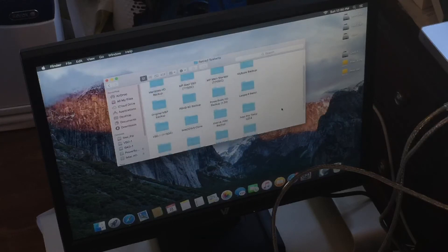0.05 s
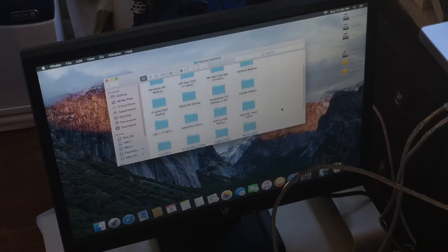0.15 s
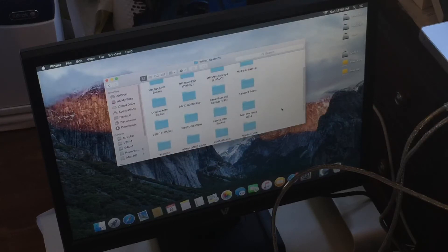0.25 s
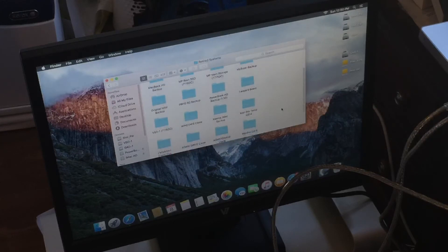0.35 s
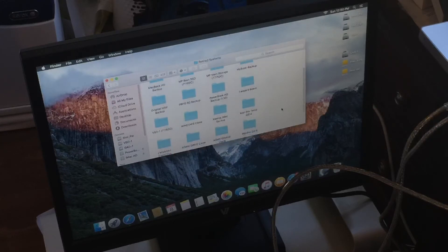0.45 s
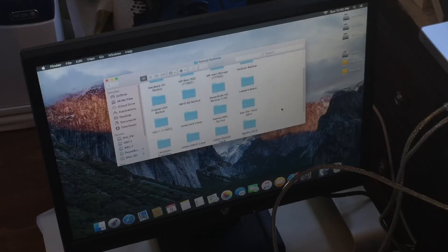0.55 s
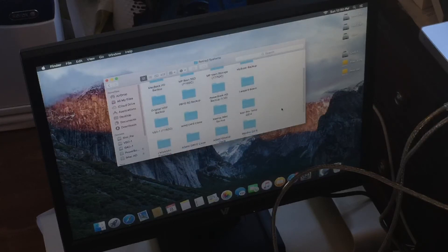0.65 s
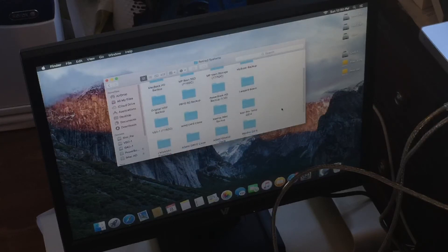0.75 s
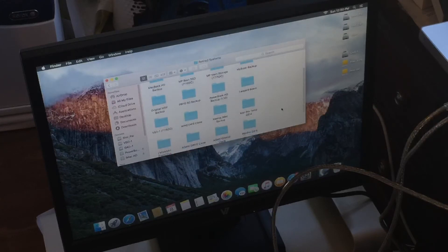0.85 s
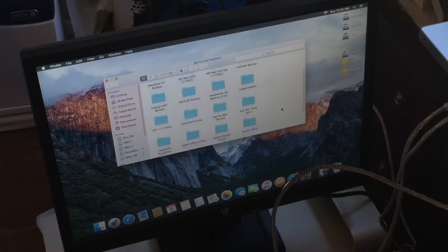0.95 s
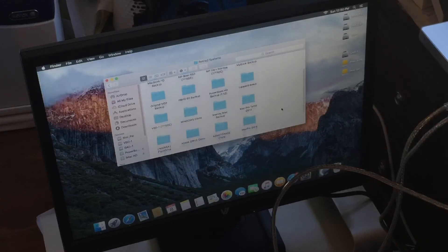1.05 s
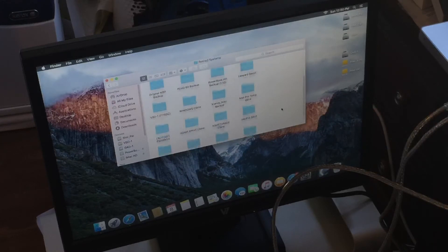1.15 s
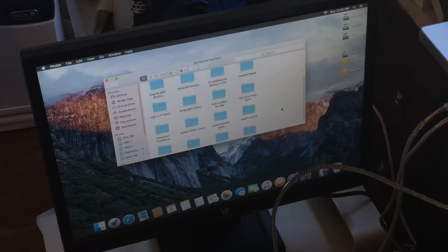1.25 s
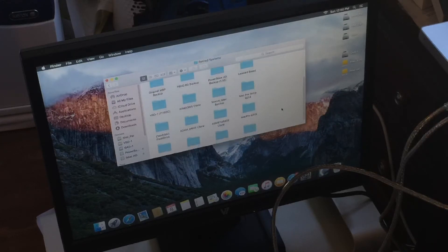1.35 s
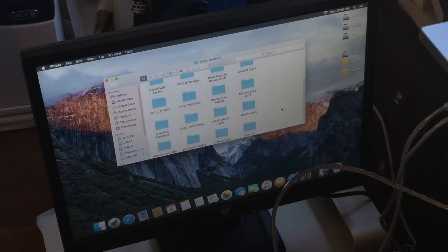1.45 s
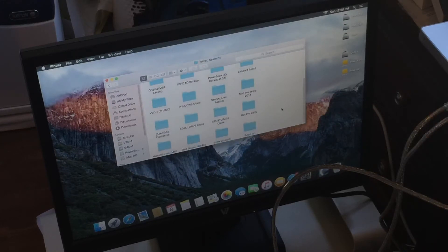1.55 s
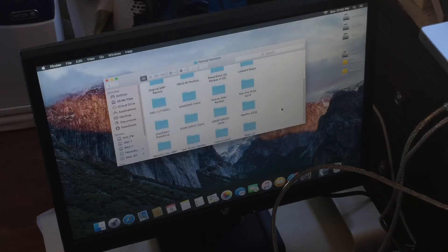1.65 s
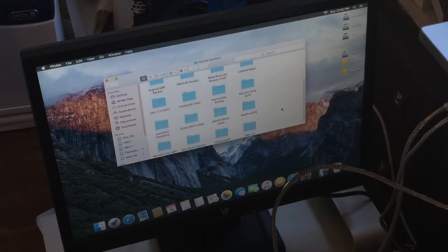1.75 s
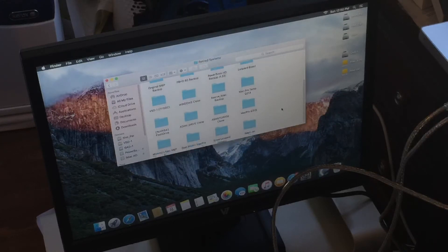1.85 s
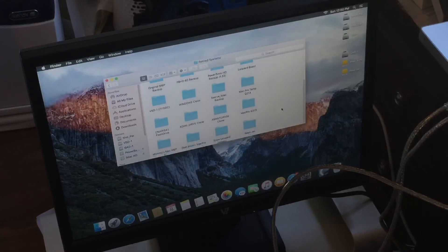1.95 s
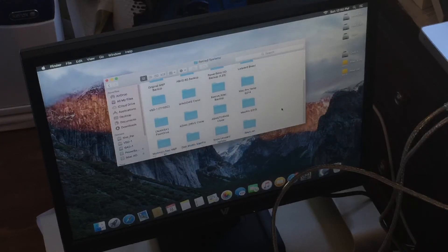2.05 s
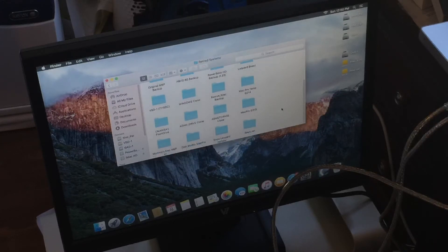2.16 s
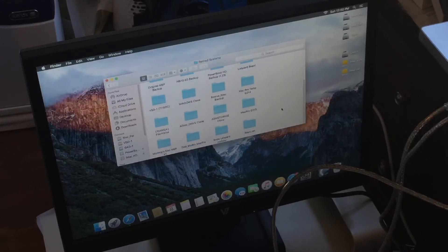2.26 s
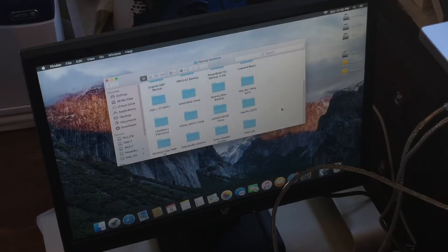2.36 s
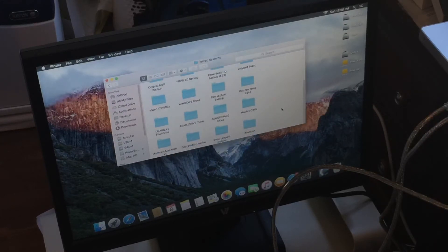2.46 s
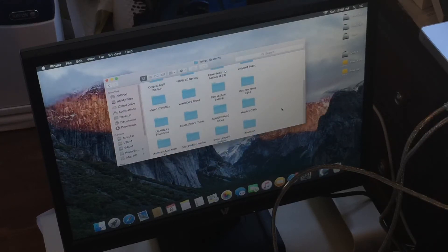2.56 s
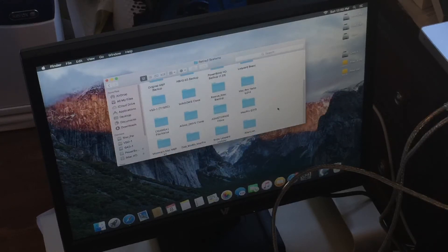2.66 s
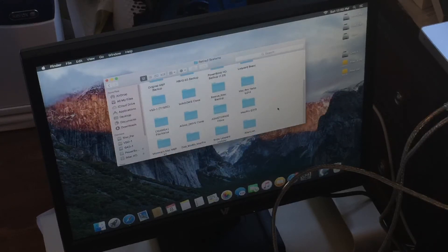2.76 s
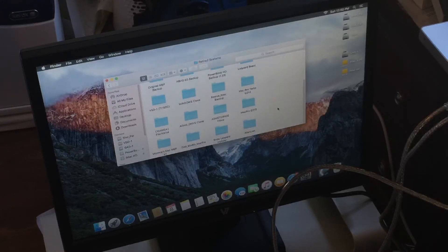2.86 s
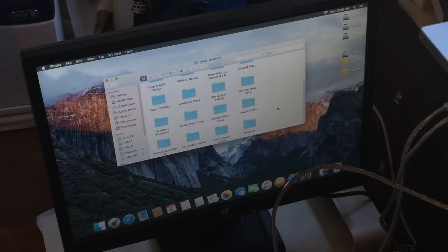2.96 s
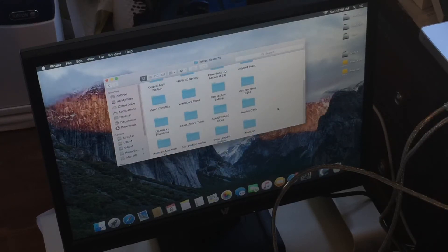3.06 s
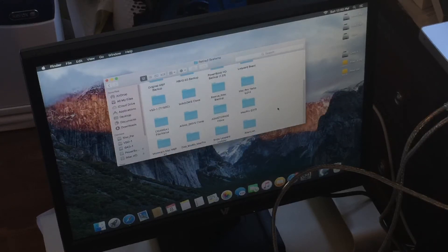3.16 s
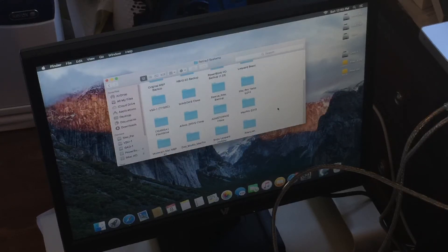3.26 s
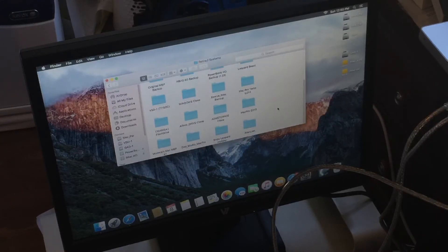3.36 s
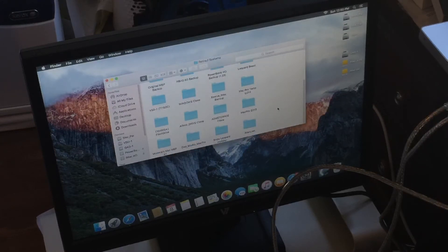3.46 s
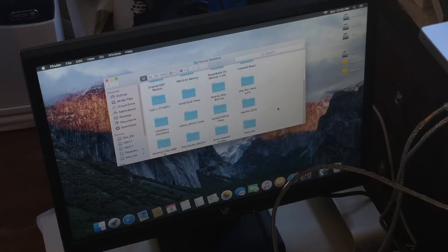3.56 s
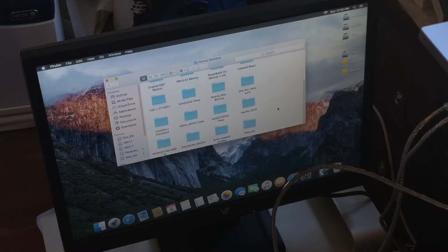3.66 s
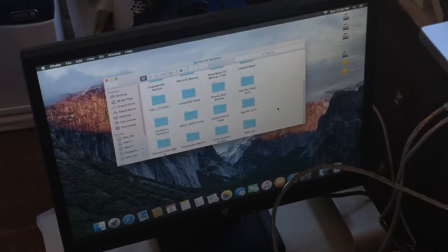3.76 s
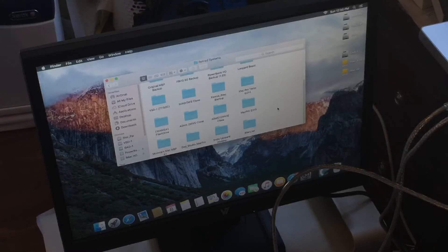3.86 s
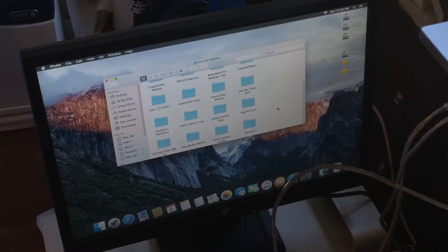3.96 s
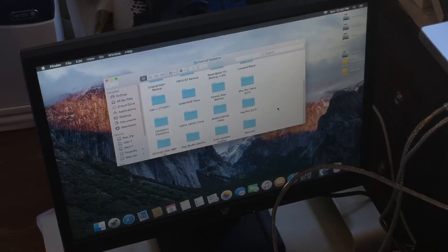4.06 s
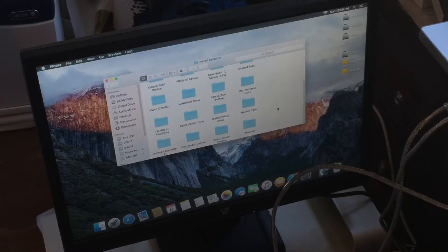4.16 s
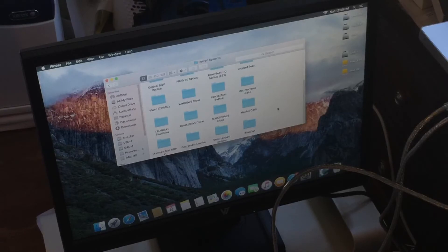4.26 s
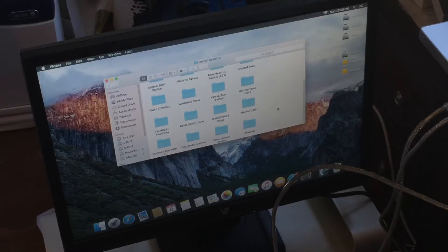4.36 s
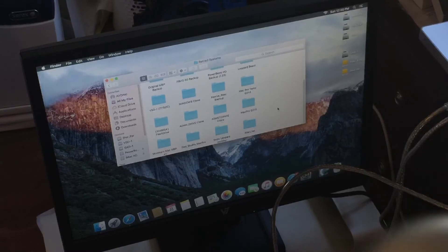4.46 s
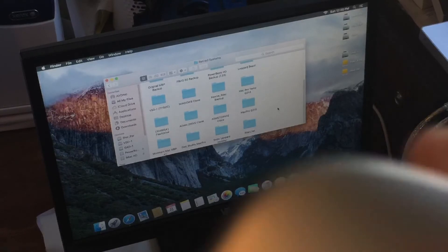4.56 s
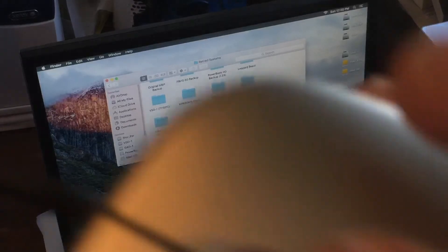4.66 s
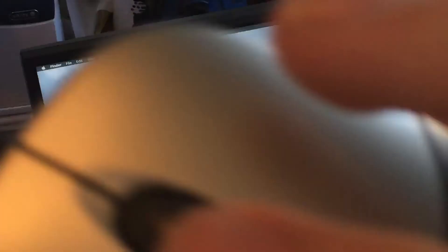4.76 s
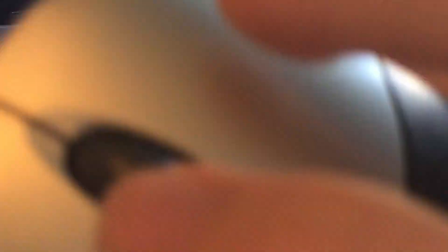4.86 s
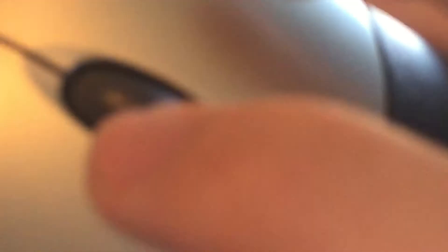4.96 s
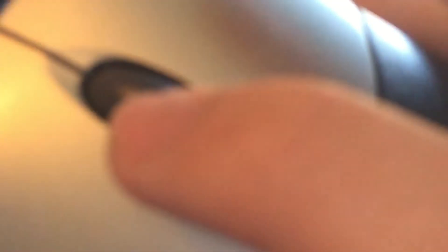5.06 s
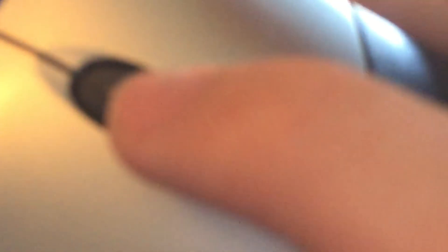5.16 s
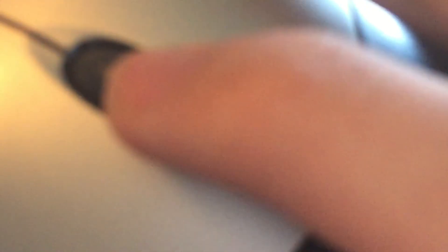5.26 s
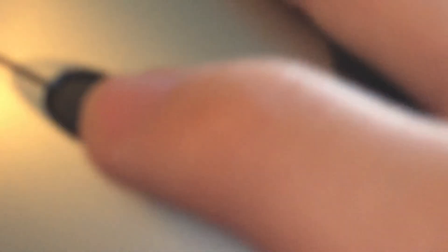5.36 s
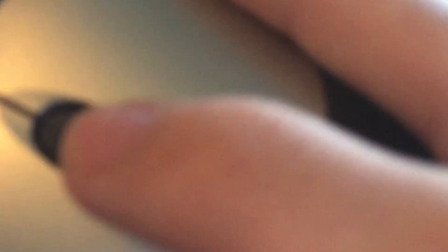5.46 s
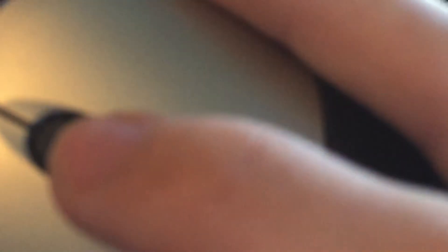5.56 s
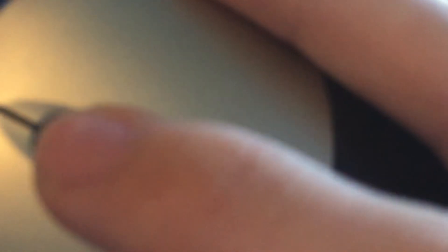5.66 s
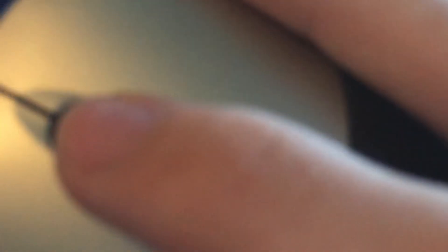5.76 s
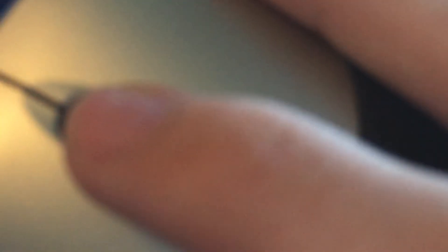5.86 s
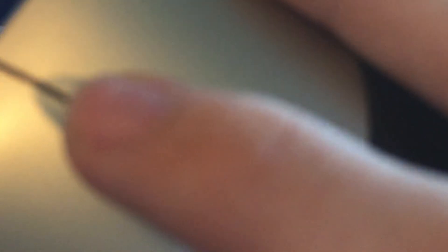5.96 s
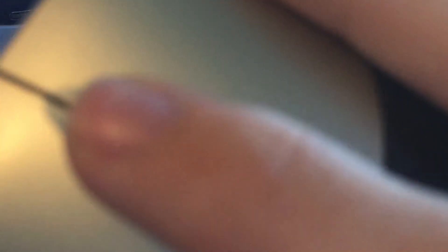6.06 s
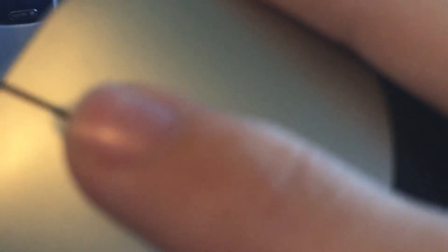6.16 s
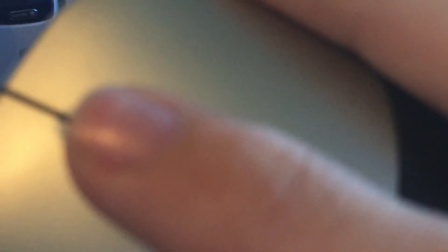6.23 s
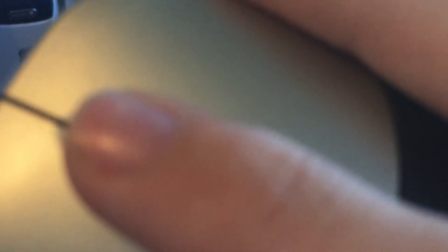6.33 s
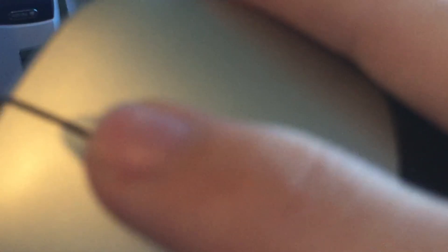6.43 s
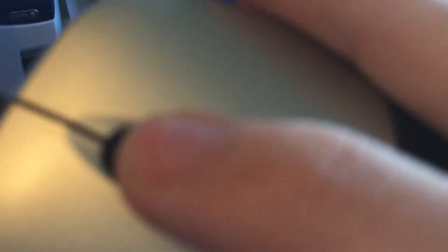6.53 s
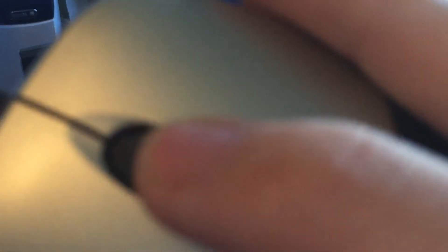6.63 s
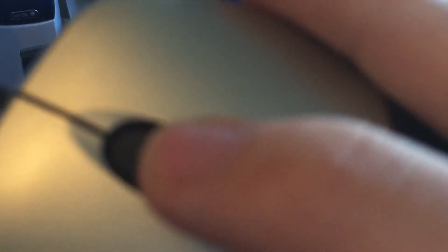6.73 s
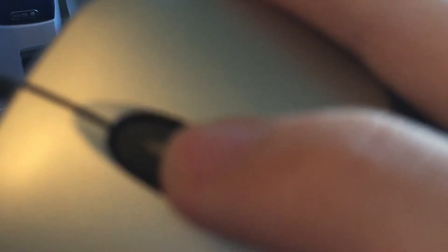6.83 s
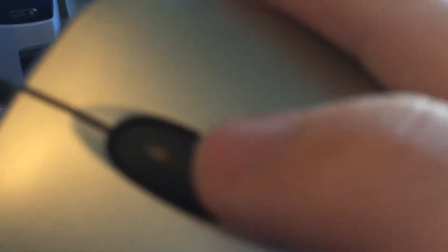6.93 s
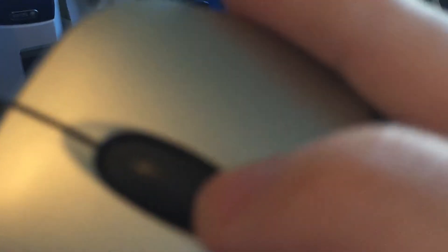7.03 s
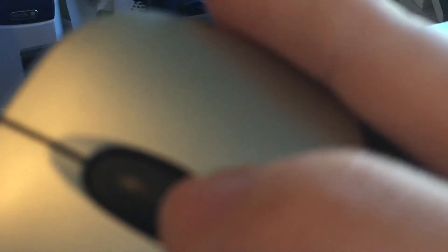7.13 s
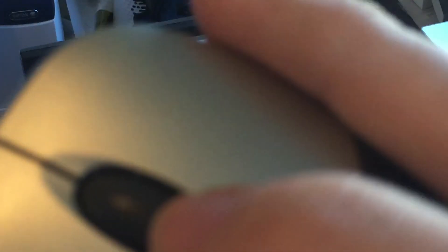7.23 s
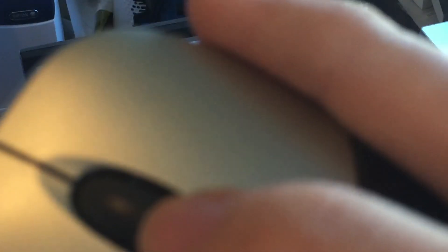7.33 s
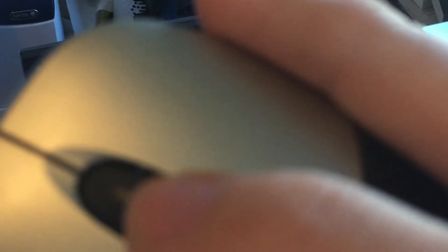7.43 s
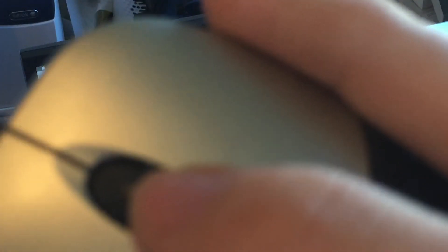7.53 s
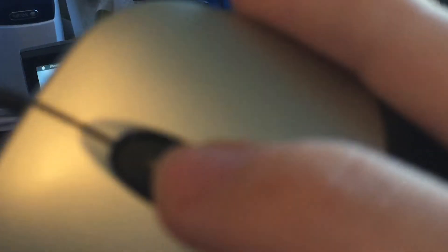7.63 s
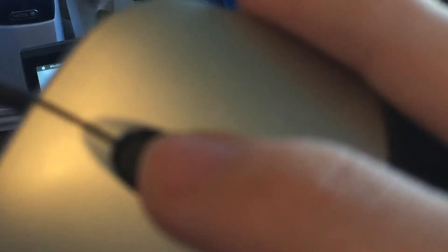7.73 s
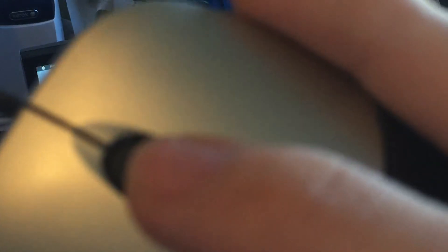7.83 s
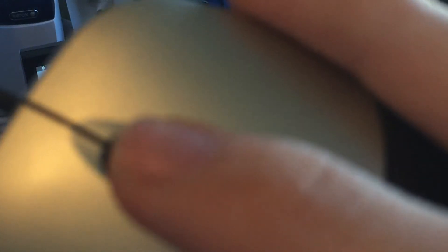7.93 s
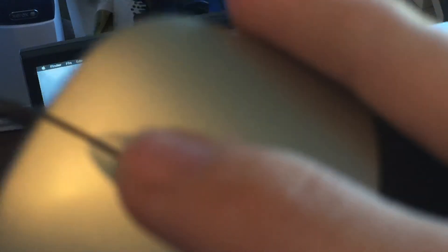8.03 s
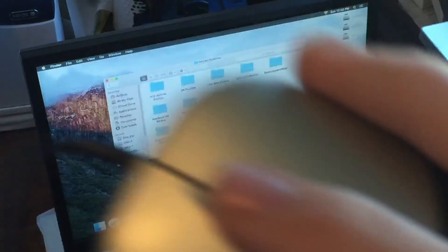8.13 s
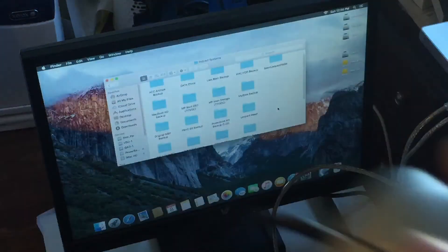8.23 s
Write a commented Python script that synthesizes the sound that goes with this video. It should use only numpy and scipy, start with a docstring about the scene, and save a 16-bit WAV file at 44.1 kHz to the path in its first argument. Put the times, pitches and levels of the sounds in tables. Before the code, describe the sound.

Soft, low fan air and a faint hum run throughout in a small room. From 0.2 to 2.4 seconds a mouse wheel on the desk gives quiet, dry, bright ticks, singly or in loose groups, some with a barely audible squeak before the click. A faster cluster of five comes at 2.9-3.15, after a faint tap at 2.6. At 3.66 a hard hollow plastic knock lands, with a desk clack and low boom at 3.7, then short scrapes and dull hand thuds until 4.4, the strongest rub at 4.3. A double shell knock comes at 4.65 and a light one at 5.3. From 5.7 the wheel is close and far louder: crisp, springy snaps at 5.7, 6.0, 6.2, 6.6, 6.7, 6.8, 7.5, 7.7, 7.9 and 8.2, many preceded by a short rising squeak, with faint finger taps between. A small knock and slide end it.

```python
"""The scroll wheel of a computer mouse is rolled notch by notch, quietly on a desk, then loud and close in the hand.
The wheel often squeaks as it climbs a notch, then its spring snaps in and rings the plastic shell: damped modes
plus a noise crack. Knocks ring the hollow shell, desk bumps clack and boom, a hand thuds, and shaped noise makes
the mouse slide. Fan air and hum lie under it all; a small room answers with near echoes and a diffuse tail."""
import sys
import numpy as np
from scipy import signal
from scipy.fft import rfft, irfft, next_fast_len
from scipy.io import wavfile
from scipy.ndimage import map_coordinates

SR = 44100
rng = np.random.default_rng(int(sys.argv[2]) if len(sys.argv) > 2 else 0)


def generate_wav(sig):
    """Save sig (samples, or channels by samples) to the path in sys.argv[1] as 16-bit PCM at SR."""
    pcm = np.round(np.clip(np.atleast_2d(sig).T, -1, 1) * 32767).astype(np.int16)
    wavfile.write(sys.argv[1], SR, pcm)


N = 365588
TIME = np.arange(N) / SR  # s, whole scene
AGE = np.arange(SR // 2) / SR  # s since a sound began, half a second long

# the wheel snaps into a notch: (t/s, level/dB)
NOTCH_SNAPS = [(0.167, -42), (0.32, -42.5), (.9186, -45), (1.0669, -43), (1.1206, -44), (1.287, -43),
               (1.4171, -43.5), (1.8561, -47), (2.0098, -44), (2.1616, -43), (2.2872, -43), (2.4118, -45.5),
               (2.9308, -43.5), (2.9522, -42), (3.0213, -42.5), (3.078, -39.5), (3.153, -40.5),
               (5.7103, -21), (6.0397, -22.5), (6.1774, -23), (6.562, -28), (6.6949, -22.5),
               (6.8376, -21.5), (7.4963, -22.5), (7.7381, -23), (7.9448, -22.5), (8.1717, -25)]
# friction spectrum of axle and spring: (f/Hz, level/dB)
FRICTION = [(500, -4), (1000, 0), (2200, 1.5), (4400, 1), (7000, -5.5), (15000, -21)]


def amp(db):
    """Decibels to gain."""
    return 10 ** (np.asarray(db) / 20)


def unit(x):
    """x at rms 1."""
    return x / np.sqrt(np.mean(x ** 2) + 1e-20)


def punch(x):
    """A hit scaled to rms 1 over its first 4 ms."""
    return x / np.sqrt(np.mean(x[:SR // 250] ** 2) + 1e-20)


def along(points, hz):
    """A curve through (f/Hz, value) points, straight on a log frequency axis."""
    f, v = np.transpose(points)
    return np.interp(np.log(hz + 1), np.log(f + 1), v)


def filtered(x, response):
    """x times a response of frequency, applied in the spectrum."""
    m = next_fast_len(len(x) + 4096)
    spectrum = rfft(x, m) * response(np.fft.rfftfreq(m, 1 / SR))
    return irfft(spectrum, m)[:len(x)]


def noise(spectrum, size):
    """Coloured noise of rms 1."""
    white = rng.standard_normal(size)
    return unit(filtered(white, lambda hz: amp(along(spectrum, hz))))


def wobble(rate, size):
    """A smooth random curve, rate knots a second."""
    knots = rng.standard_normal(int(size * rate / SR) + 4)
    return map_coordinates(knots, [np.arange(size) * rate / SR])


def add(track, s, sound):
    """Mix a sound in at time s."""
    part = track[max(round(s * SR), 0):][:len(sound)]
    part += sound[:len(part)]


def decay(t60):
    """Exponential fade that loses 60 dB in t60 seconds."""
    return np.exp(-np.log(1000) * AGE / t60)


def onset(rise):
    """Contact force builds up over rise seconds."""
    return 1 - np.exp(-(AGE / rise) ** 2)


def ring(modes, scatter_db, detune, damping=1):
    """Damped modes, neighbours in opposite phase, struck a little differently every time."""
    hz, db, t60 = np.transpose(modes)[:, :, None]
    size, shift, lag = rng.standard_normal((len(modes), 3)).T[:, :, None]
    sign = (-1) ** np.arange(len(modes))[:, None]  # no deep notches between the resonances
    swing = sign * np.sin(2 * np.pi * hz * (1 + detune * shift) * AGE + .5 * lag)
    return (amp(db + scatter_db * size) * decay(t60 / damping) * swing).sum(0)


def crack(spectrum, t60):
    """The brief noise of a contact."""
    return punch(noise(spectrum, len(AGE)) * decay(t60))


def hold(s):
    """How the wheel sounds at time s: the mouse lies on the desk, then is held up in the hand."""
    # levels/dB, rebound delay/s, damping factor, squeak start/Hz; colour: (f/Hz, level/dB)
    on_desk = dict(usual_db=-44.5, rebound_db=-4, rebound_s=.0028, crack_db=-3.5, damping=1.7, rub_db=-65.5, squeak_hz=987, colour=[(1000, -6),
               (2100, -6), (2600, 1), (3200, 1), (4300, -1), (6500, -3.5), (15000, -1.5)])
    in_hand = dict(usual_db=-23, rebound_db=-17, rebound_s=.0036, crack_db=-7, damping=1.04, rub_db=-56.5, squeak_hz=876, colour=[(700, 4.5),
               (1500, -2), (2500, 1), (3300, -3), (4200, -0.5), (15000, -0.5)])
    pickup_s = 4.5
    return on_desk if s < pickup_s else in_hand


def background(air_db=-63):
    """Fan air and hiss as steady coloured noise, under a slightly unsteady hum of sine tones."""
    # air spectrum: (f/Hz, level/dB)
    air = [(12, -49), (20, -37), (49, -4), (92, -1.5), (121, -5.5), (189, -5.5), (272, -6.5), (330, -9),
           (718, -12.5), (1090, -15), (2180, -16.5), (2370, -16), (2870, -16.5), (12900, -27), (15200, -28)]
    # mains and fans: (f/Hz, level/dB)
    hum_tones = [(119.8, -73), (279, -83), (720, -84)]
    hum = np.zeros(N)
    for hz, db in hum_tones:
        drift = 1.07 * wobble(5.4, N)  # phase in radians
        hum += amp(db) * unit(np.sin(2 * np.pi * hz * TIME + drift))
    return amp(air_db) * noise(air, N) + hum


def squeaks(end_hz=1120, overtone_db=-18, rub_db=-16, waver=0.015):
    """Stick and slip at the axle: the pitch climbs with the spring's tension and stops at the snap."""
    # the axle starts to squeak and goes on until the next notch: (t/s, level/dB)
    squeak_starts = [(.142, -67.5), (0.297, -60.5), (.893, -69), (1.043, -62), (1.26, -66.5), (1.393, -60),
                     (1.83, -58.5), (1.978, -58.5), (5.673, -47.5), (6.015, -40), (6.15, -59),
                     (6.818, -45.5), (7.711, -54), (7.917, -41), (8.152, -43)]
    out = np.zeros(N)
    for s, db in squeak_starts:
        snap_s = min(t for t, _ in NOTCH_SNAPS if t > s)
        size = int((snap_s - s) * SR)
        climb = np.linspace(0, 1, size)
        glide = end_hz + (hold(s)["squeak_hz"] - end_hz) * (1 - climb) ** 1.52
        hz = glide * (1 + waver * wobble(480, size))
        phase = 2 * np.pi * np.cumsum(hz) / SR
        overtones = np.sin(2 * phase) + .5 * np.sin(4 * phase)
        tone = unit(np.sin(phase) + amp(overtone_db) * overtones)
        rubbing = amp(rub_db) * noise(FRICTION, size)
        swell = np.abs(np.sin(.93 * np.pi * climb)) ** 0.82 * amp(2.3 * wobble(204, size))
        add(out, s, amp(db) * (tone + rubbing) * swell)
    return out


def climbs(climb_s=.018, slip_s=0.00031, slip_db=-14):
    """Before every snap the spring rubs up the tooth, loudest as it slips over the tip."""
    out = np.zeros(N)
    left = np.arange(int(climb_s * SR), 0, -1) / SR  # s until the snap
    for s, db in NOTCH_SNAPS:
        rub = amp(hold(s)["rub_db"]) * np.sqrt(np.abs(1 - left / climb_s))
        slip = amp(db + slip_db) * np.exp(-left / slip_s)
        add(out, s - climb_s, (rub + slip) * noise(FRICTION, len(left)))
    return out


def notches(rise_s=0.0011, dulling=.33):
    """The spring slides off the tooth into the notch, rings the mouse and rebounds once."""
    # wheel, spring and shell ringing together, before the hold's damping: (f/Hz, level/dB, t60/s)
    wheel_modes = [(1045, -33.5, 0.075), (1554, -23.5, 0.041), (1900, -7.5, 0.018), (2342, 3, 0.0079),
                   (2591, -3, 0.022), (3178, -13, 0.038), (3700, -8, 0.016), (4045, -4, 0.019),
                   (4364, -2.5, 0.015), (4635, -9, 0.016), (5450, -1, 0.01), (5705, -8.5, 0.0091),
                   (6300, -22.5, 0.045), (6480, -18, 0.026), (8420, -16, 0.011), (14400, -12, 0.0083)]
    # noise of the snap: (f/Hz, level/dB)
    snap_spectrum = [(300, -45), (800, -14.5), (2200, -2.5), (4300, -0.5), (6500, -3), (7500, -12),
                     (9300, -10), (10700, -22.5), (13000, -17), (15000, -15.5)]
    out = np.zeros(N)
    for s, db in NOTCH_SNAPS:
        grip = hold(s)
        # a firmer snap is duller: dB per octave lost for each dB over the usual level
        dull_db = dulling * (db - grip["usual_db"])

        def colour(hz):
            octaves = np.log2(np.clip(hz, 1900, 4500))
            return amp(along(grip["colour"], hz) - dull_db * octaves)

        rebound_s = grip["rebound_s"] * rng.uniform(.8, 1.2)
        for delay, level_db in [(0, 0), (rebound_s, grip["rebound_db"])]:
            modes = ring(wheel_modes, scatter_db=2.23, detune=0.007, damping=grip["damping"])
            body = punch(modes * onset(rise_s))
            snap = punch(crack(snap_spectrum, t60=0.013) * onset(rise_s))
            hit = punch(filtered(body + amp(grip["crack_db"]) * snap, colour))
            add(out, s + delay, amp(db + level_db) * hit)
    return out


def knocks(crack_db=-3, contact_cycles=1.75):
    """The hollow shell is knocked; a soft finger presses more slowly and excites only its low modes."""
    # fingers and desk knock the shell, its hollow note shifts with the grip:
    # (t/s, level/dB, hardness/Hz, hollow note/Hz)
    shell_hits = [(2.6215, -44, 2670, 837), (3.6628, -30.5, 14900, 885), (4.2128, -48.5, 1920, 1220),
                  (4.234, -51, 1930, 1210), (4.6515, -38.5, 4960, 848), (4.6558, -32.5, 5800, 840),
                  (4.7705, -53.5, 2150, 820), (5.2925, -40.5, 4160, 880), (6.9505, -45, 2230, 723),
                  (7.1865, -52, 2000, 756), (7.555, -50.5, 2060, 860), (7.566, -47, 2000, 890),
                  (7.5775, -53, 2000, 806), (7.7165, -50, 3300, 950), (8.2108, -41.5, 15300, 860),
                  (8.2505, -52, 1600, 740)]
    # resonances of the shell: (f/Hz, level/dB, t60/s)
    shell_modes = [(1040, -18.5, 0.038), (1360, -19.5, 0.015), (1804, -10, 0.015), (2066, -8, 0.026),
                   (2484, -7.5, 0.016), (3220, -9.5, 0.016), (3800, -10, 0.0063), (4420, 1, 0.0048),
                   (5530, -9, 0.0065)]
    # noise of the contact: (f/Hz, level/dB)
    tap_spectrum = [(300, -35), (800, -38), (2200, -5), (5000, 0), (7500, -1), (10000, -10.5),
                    (14000, -13.5)]
    # a fingertip's hardness, the hollow ring it gives, and the change with harder contact
    soft_hz, soft_hollow_db, hollow_db_per_octave = 1950, -2, -6
    out = np.zeros(N)
    for s, db, hard_hz, hollow_hz in shell_hits:
        contact = onset(contact_cycles / hard_hz)
        shell = punch(ring(shell_modes, scatter_db=2, detune=.03))
        hit = (shell + amp(crack_db) * crack(tap_spectrum, t60=0.0063)) * contact
        hit = punch(filtered(hit, lambda hz: 1 / np.sqrt(1 + (hz / hard_hz) ** 6)))
        hollow_db = soft_hollow_db + hollow_db_per_octave * np.log2(hard_hz / soft_hz)
        hollow = punch(np.sin(2 * np.pi * hollow_hz * AGE) * decay(0.027) * onset(rise=0.0027))
        add(out, s, amp(db) * punch(hit + amp(hollow_db) * hollow))
    return out


def bumps():
    """The desk top clacks at once; its slow bending modes boom after."""
    # the desk is bumped: (t/s, clack level/dB, boom level/dB)
    desk_hits = [(3.7155, -37, -36.5), (3.757, -50, -52), (4.026, -52, -74), (4.212, -52, -82),
                 (4.386, -55, -61)]
    # bending modes of the desk top: (f/Hz, level/dB, t60/s)
    desk_modes = [(52.8, -7, 0.59), (64, -11, 0.54), (84.5, -8, 0.43), (96, -3, 0.4), (121, -3, 0.16),
                  (208, -18, .25)]
    # noise of the clack: (f/Hz, level/dB)
    clack_spectrum = [(120, 3), (250, 3), (430, -14), (640, 5.5), (900, -10), (1250, -6), (1600, 9.5),
                      (1950, 0), (2400, 2), (3000, -8), (5000, -11), (9000, -16), (15000, -61)]
    out = np.zeros(N)
    for s, clack_db, boom_db in desk_hits:
        clack = noise(clack_spectrum, len(AGE)) * decay(0.18) * onset(rise=0.0004)
        boom = ring(desk_modes, scatter_db=.5, detune=.005) * onset(rise=0.022)
        add(out, s, amp(clack_db) * clack)
        add(out, s, amp(boom_db) * boom)
    return out


def sliding(grain_db=-1.0, catch_db=1.1):
    """Mouse and hand rub over the desk: friction catches in tiny grains, and the desk top rumbles under it."""
    # the mouse is pushed over the desk: (t/s, length/s, friction level/dB, rumble level/dB)
    strokes = [(3.721, 0.069, -60.5, -64), (3.851, .055, -53, -59.5), (3.932, 0.05, -53.5, -64),
               (4.014, 0.022, -47.5, -54.5), (4.296, 0.065, -38.5, -59.5), (8.196, 0.065, -47.5, -48)]
    # friction hiss: (f/Hz, level/dB)
    scrape_spectrum = [(300, -39), (700, -3), (1300, 0), (2300, 1), (3400, 2), (4500, -1), (6200, -7.5),
                       (7500, -17.5), (9300, -20), (10600, -28), (15000, -32)]
    # desk top under the push: (f/Hz, level/dB)
    rumble_spectrum = [(60, -8), (150, -5), (230, 8.5), (380, -9.5), (650, 1.5), (1000, -1.5), (2000, -22)]
    # a push starts softly, gathers speed and runs out
    attack_s, swell_db_per_s, release_db_per_s = 0.0097, 49, 233
    out, size = np.zeros(N), len(AGE)
    for s, length, friction_db, rumble_db in strokes:
        grains = amp(grain_db * wobble(860, size) + catch_db * wobble(108, size))
        hiss = unit(noise(scrape_spectrum, size) * grains)
        push_db = np.minimum(swell_db_per_s * (AGE - length), release_db_per_s * (length - AGE))
        speed = onset(attack_s) * amp(push_db)
        rumble = noise(rumble_spectrum, size)
        add(out, s, speed * (amp(friction_db) * hiss + amp(rumble_db) * rumble))
    return out


def thuds(t60=0.21, rise_s=.004):
    """Soft flesh on the desk top: a dull thud with no clack."""
    # the heel of the hand lands on the desk: (t/s, level/dB)
    hand_landings = [(3.895, -51), (4.026, -49), (4.391, -48)]
    # noise of the thud: (f/Hz, level/dB)
    thud_spectrum = [(40, -16), (110, -9), (190, 3), (300, -3), (420, -21), (1000, -36), (4000, -70)]
    out = np.zeros(N)
    for s, db in hand_landings:
        add(out, s, amp(db) * noise(thud_spectrum, len(AGE)) * decay(t60) * onset(rise_s))
    return out


def room_answer(tail_db=-1):
    """A few near surfaces and a diffuse tail whose bands decay at different rates, coloured together."""
    # decay of the tail: (f/Hz, t60/s)
    tail_t60 = [(100, 0.6), (1000, 0.18), (4000, 0.25), (8000, 0.24), (15000, 0.2)]
    # tone of the whole answer: (f/Hz, level/dB)
    room_tone = [(100, 1), (700, -1.5), (1100, 3), (2300, -5), (2850, -12.5), (3200, -4), (3600, -1.5),
                 (4060, -11.5), (4500, -2.5), (5400, -7), (7000, -2), (10000, -7), (15000, -6)]
    # desk, screen and walls, before the random spread and the room tone: (delay/s, level/dB)
    reflections = [(.0032, -6.5), (.0128, -9.5), (.0152, -17), (.0232, -46)]
    hz, t, z = signal.stft(rng.standard_normal(len(AGE)), SR, nperseg=256)
    fade = np.exp(-np.log(1000) * t / along(tail_t60, hz)[:, None])
    tail = signal.istft(z * fade, SR, nperseg=256)[1][:len(AGE)] * onset(rise=0.0045)
    answer = tail * amp(tail_db) / np.linalg.norm(tail)
    for delay, db in reflections:
        add(answer, delay * rng.uniform(0.7, 1.04), amp([db]))
    return filtered(answer, lambda hz: amp(along(room_tone, hz)))


def room(x, size=SR // 4):
    """The room's share follows the mouse's distance; a fresh answer is drawn every quarter second."""
    # mouse to microphone: (t/s, distance/m)
    distance = [(3.2, 1), (3.66, 0.38), (4.4, 0.32), (4.8, 0.16), (8.3, 0.2)]
    reference_m = 0.68  # here the room is fed at the level of the direct sound
    sent = x * np.interp(TIME, *np.transpose(distance)) / reference_m
    out = np.zeros(N)
    for start in range(0, N, size):
        add(out, start / SR, signal.fftconvolve(sent[start:start + size], room_answer()))
    return out


def scene():
    """The mouse, its room and the computer, mixed to one channel."""
    mouse = squeaks() + climbs() + notches() + knocks() + bumps() + sliding() + thuds()
    return (background() + mouse + room(mouse))[None]


def record(dry, top_hz=15300):
    """A very steep low-pass removes the top of the treble."""
    def band_limit(hz):
        return 1 / np.sqrt(1 + (hz / top_hz) ** 200)

    return np.array([filtered(channel, band_limit) for channel in dry])


dry = scene()
out = record(dry)
generate_wav(out)
```